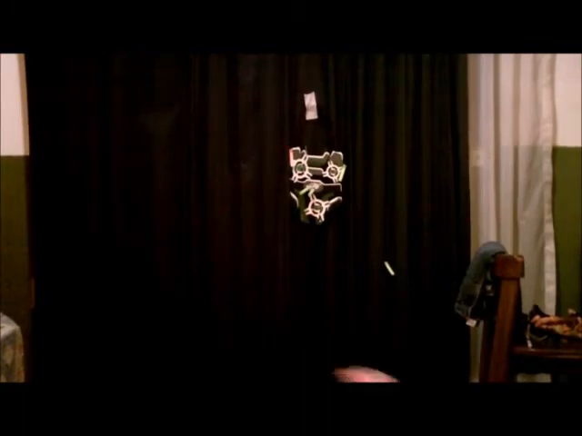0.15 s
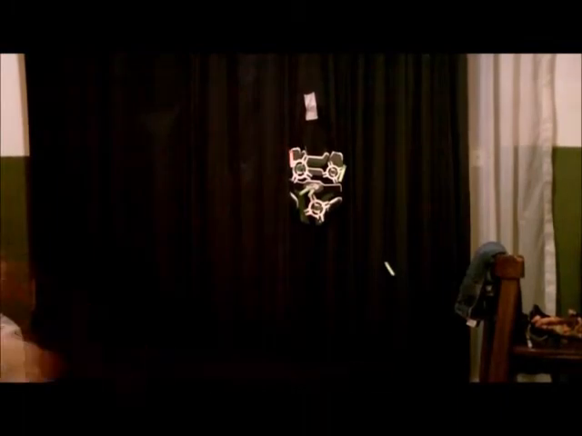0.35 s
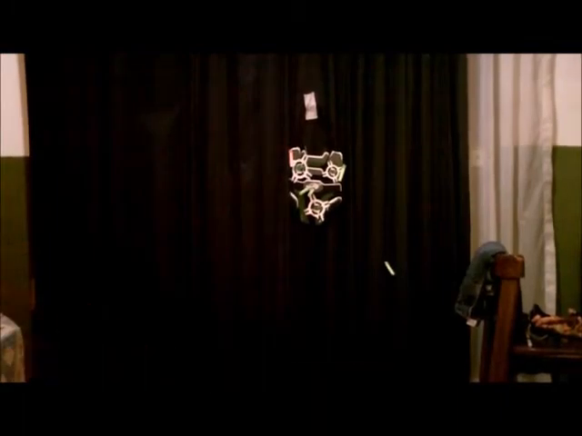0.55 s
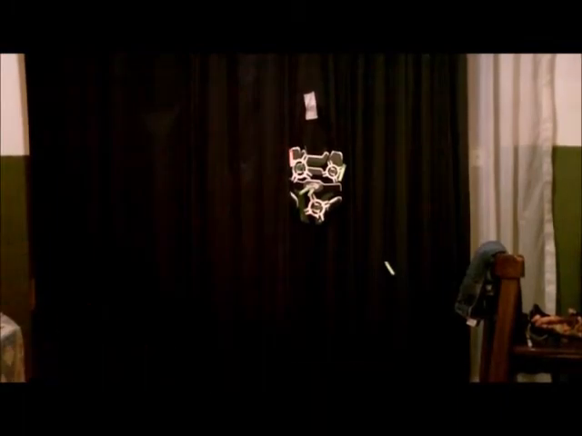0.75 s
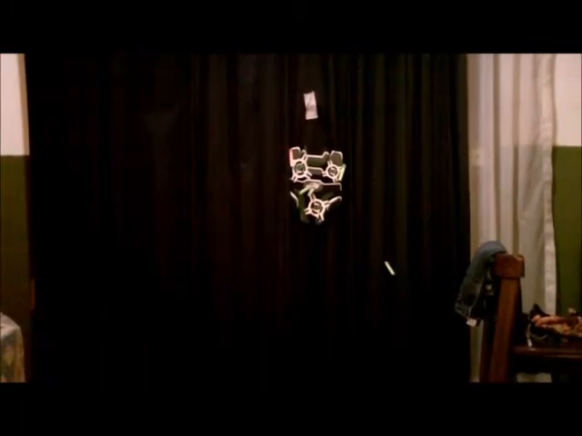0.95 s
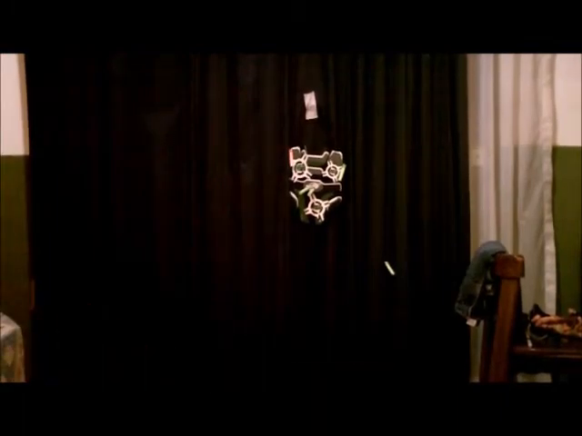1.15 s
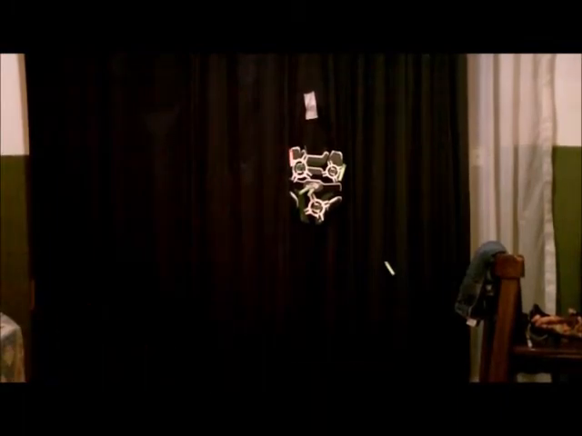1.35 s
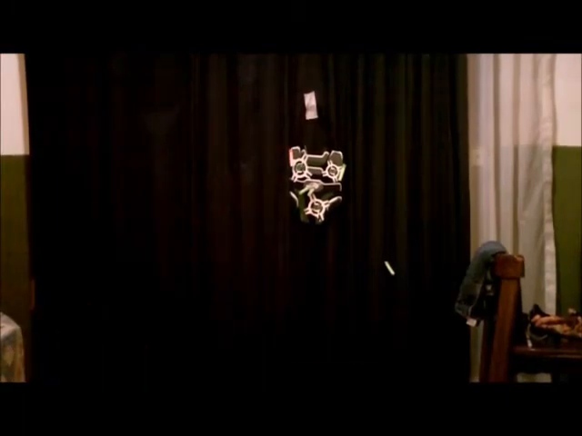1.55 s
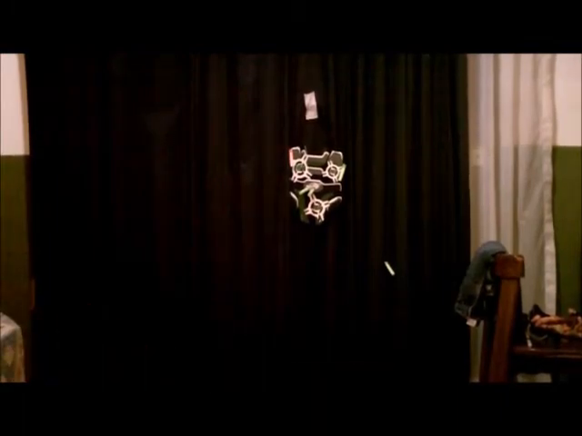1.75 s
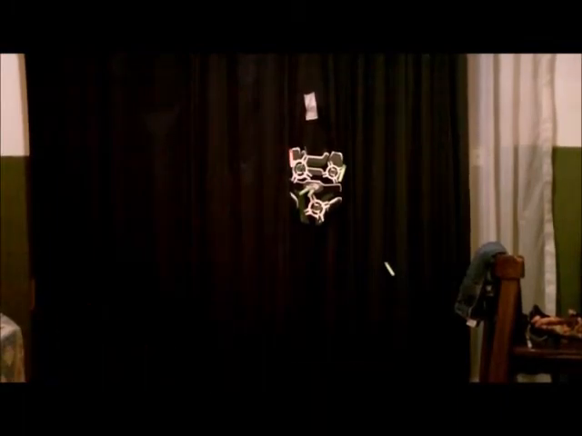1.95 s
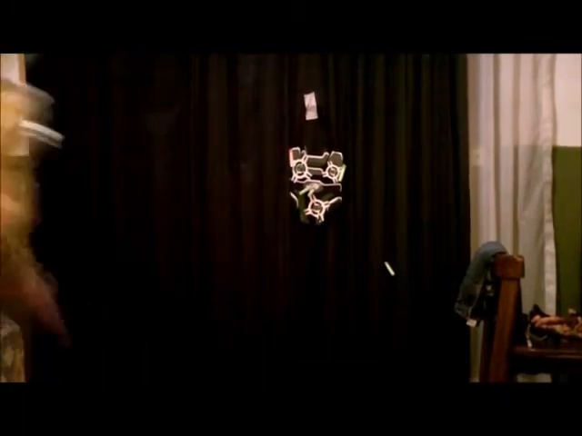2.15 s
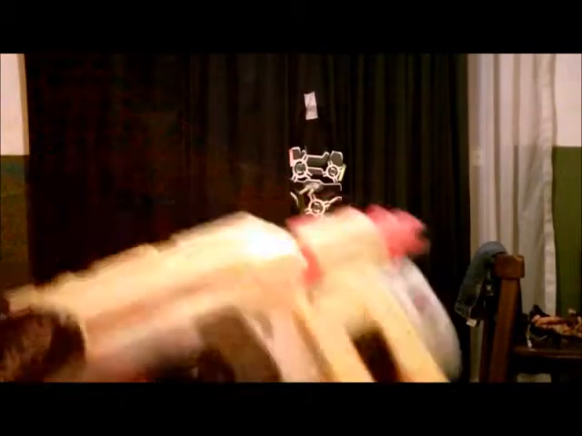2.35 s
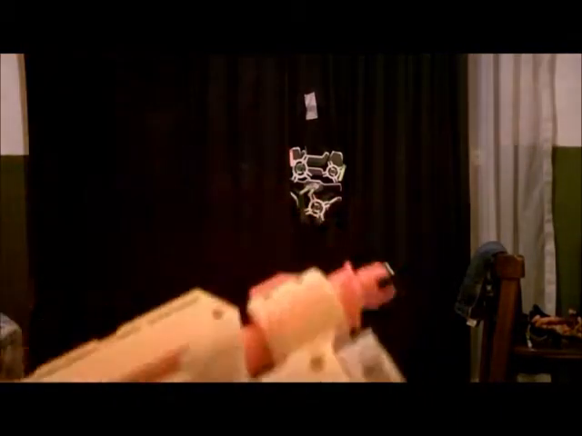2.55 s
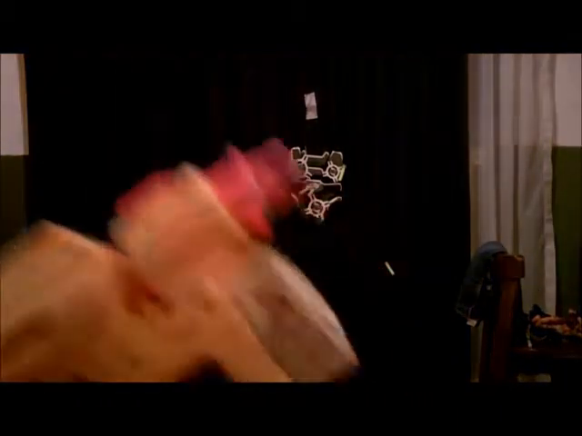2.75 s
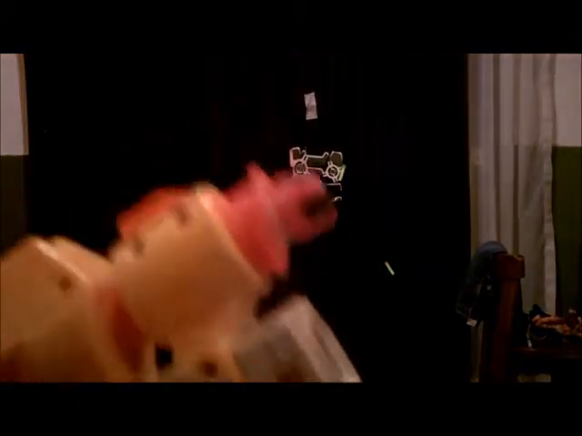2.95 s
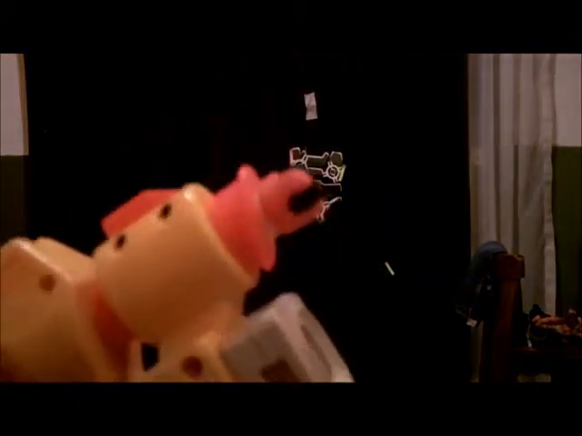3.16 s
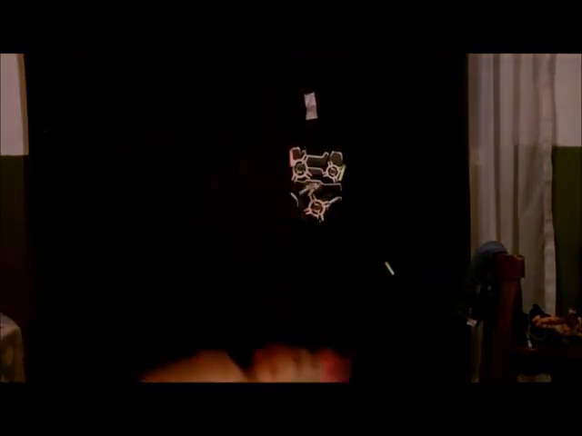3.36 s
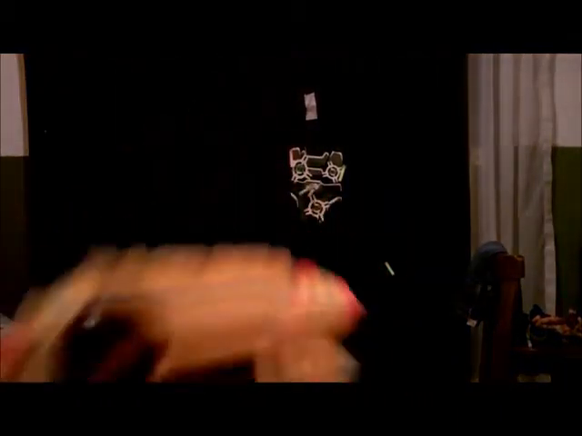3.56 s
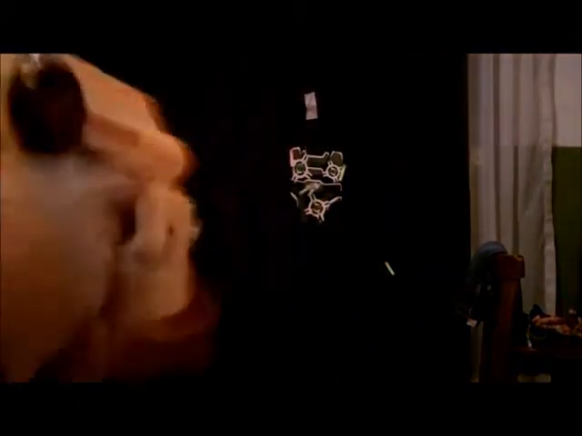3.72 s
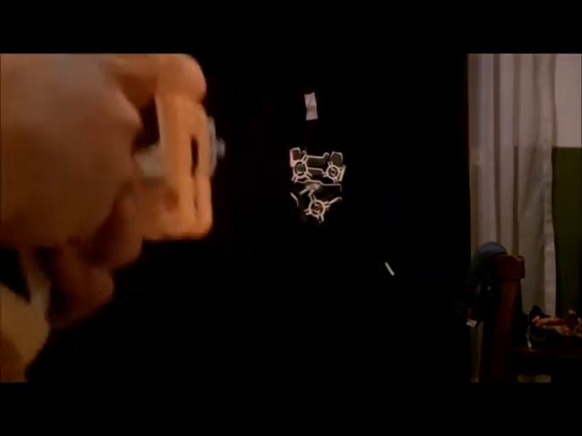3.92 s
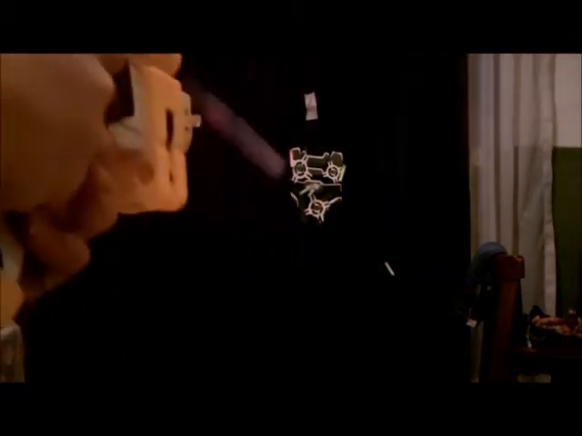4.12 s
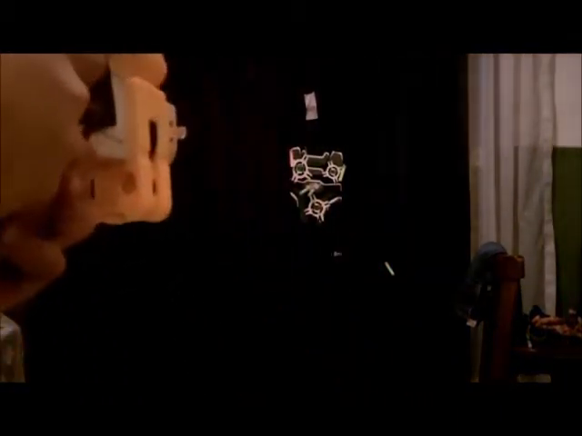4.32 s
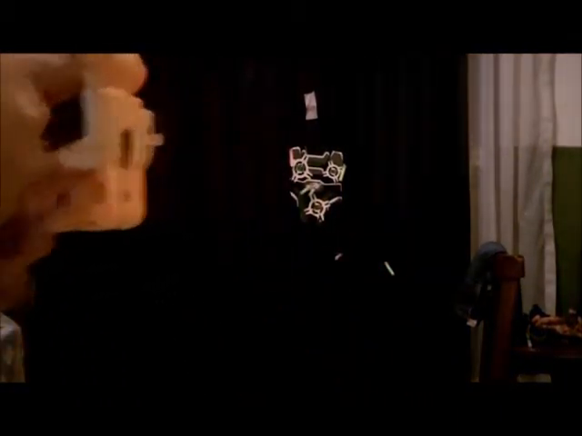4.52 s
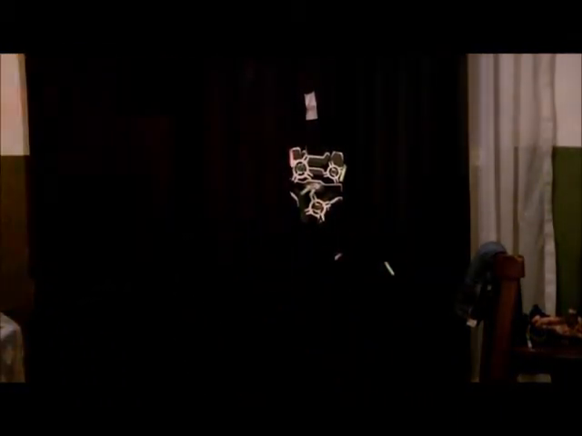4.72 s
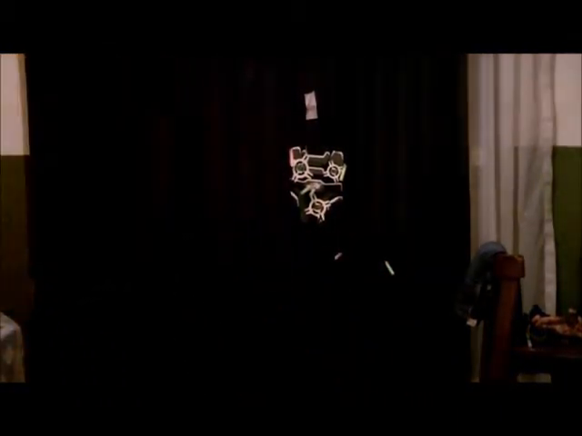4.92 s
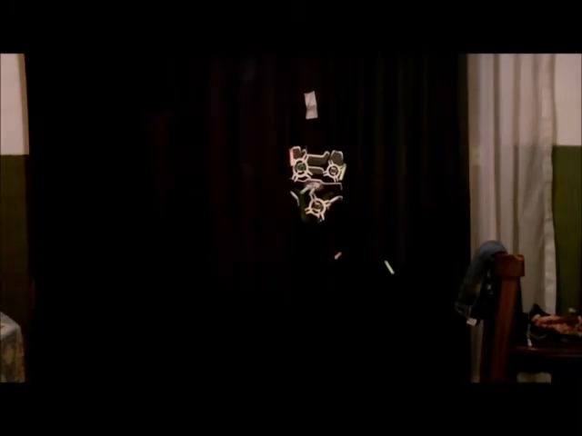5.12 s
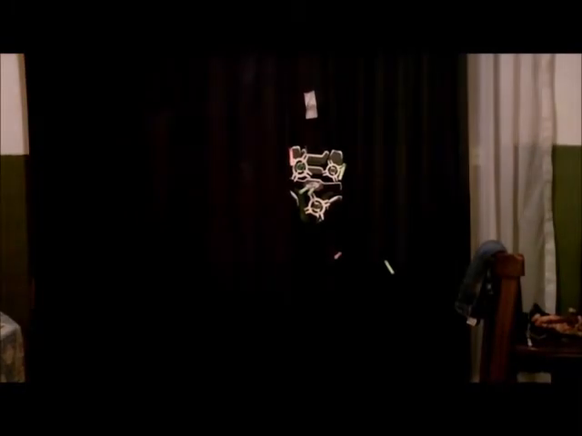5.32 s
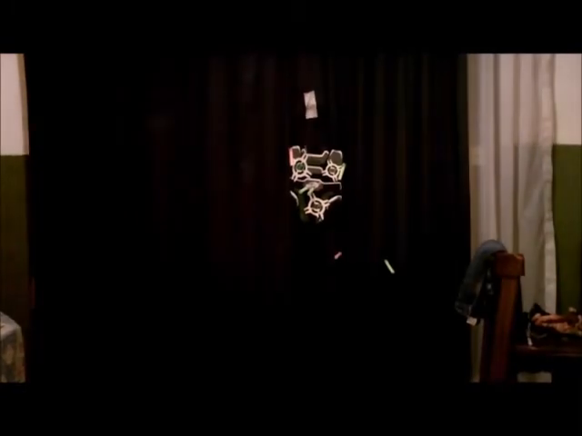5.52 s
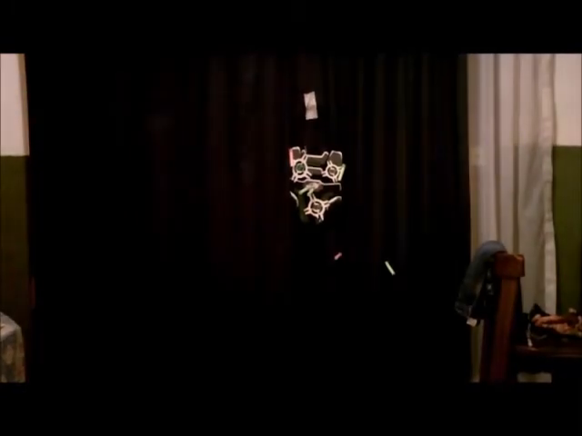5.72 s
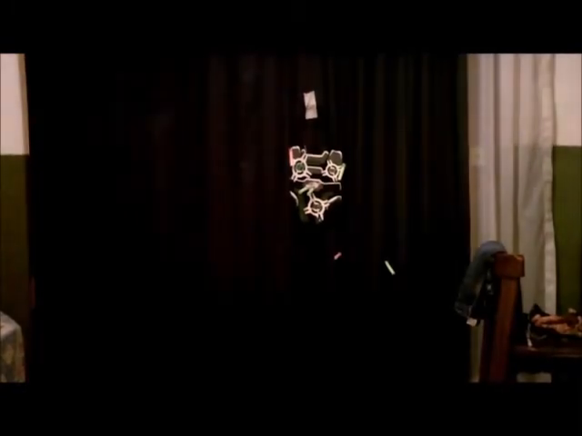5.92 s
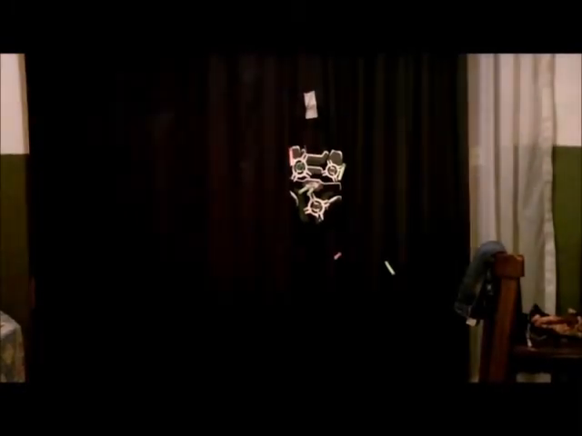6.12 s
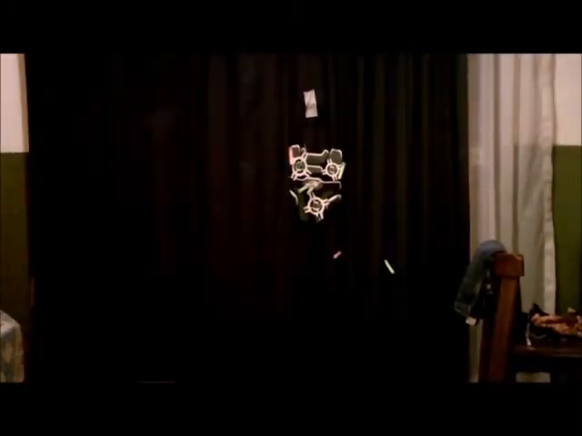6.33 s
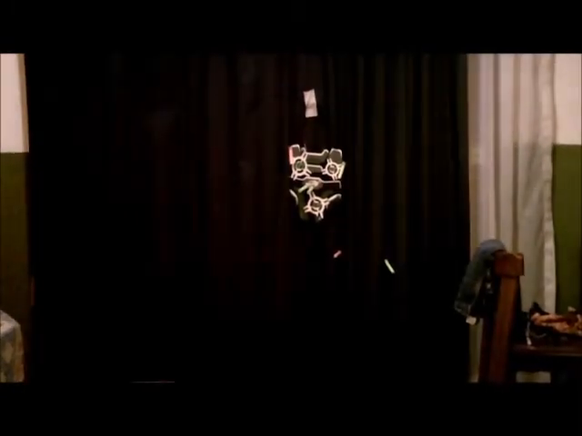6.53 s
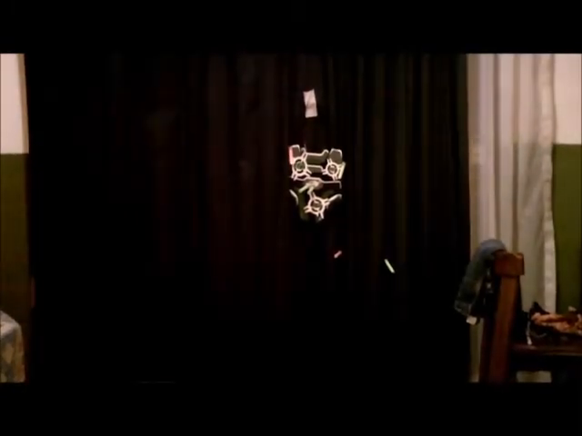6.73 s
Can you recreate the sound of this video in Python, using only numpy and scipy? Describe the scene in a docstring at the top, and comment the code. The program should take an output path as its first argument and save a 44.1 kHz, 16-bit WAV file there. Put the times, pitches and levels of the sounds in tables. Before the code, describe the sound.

A spring-powered toy dart blaster is handled near the microphone, with light rubbing and scattered plastic clicks. It is cocked with a sharp clack and fired once, a hard crack with a short metallic ring that is the loudest sound. Creaks and knocks follow as it is set down, then a few soft bumps and rubs. The small room adds a short echo over a faint rumble and hiss.

```python
"""Soft rubs and small clicks on hollow plastic, close by in a small room: a toy dart blaster is handled.
Catches snap and tight panels creak, then the slide ticks over its ratchet and slams into its stop.
On the shot, the loudest moment, the plunger hits home and bounces while the freed spring rings on.
The blaster is put down with a clatter. A limiter ducks the hardest blows and lets the room swell
up behind them."""
import sys
import numpy as np
from scipy import signal
from scipy.fft import rfft, irfft
from scipy.io import wavfile
from scipy.ndimage import uniform_filter1d

SR = 44100
rng = np.random.default_rng(int(sys.argv[2]) if len(sys.argv) > 2 else 0)


def unload_wav(signal):
    """Save mono or channel-first audio to the path in sys.argv[1] as 16-bit WAV at rate SR, clipped to [-1, 1]."""
    wavfile.write(
        sys.argv[1],
        SR,
        np.round(np.clip(np.atleast_2d(signal).T, -1, 1) * 32767).astype(np.int16),
    )


N = 298998
SHOT_S = 4.2  # the trigger releases the plunger

# the shell's registers (thump, hollow, knock, crack, sizzle): low_hz, high_hz
SHELL_REGISTERS = [(70, 290), (600, 860), (1050, 3030), (3300, 5320), (8800, 14100)]


def from_db(db):
    """Decibels to gain."""
    return 10 ** (np.asarray(db) / 20)


def unit_rms(x):
    """Scale to unit power."""
    return x / np.sqrt(np.mean(x ** 2) + 1e-20)


def at_hz(points, hz):
    """Read a curve on a log-frequency axis."""
    known_hz, values = np.transpose(points)
    return np.interp(np.log(hz + 1e-9), np.log(known_hz), values)


def tilted(db_per_octave, registers, pivot_hz=3000):
    """The dB that a spectral tilt adds to each register."""
    centre_hz = np.sqrt(np.prod(registers, axis=1))
    return db_per_octave * np.log2(centre_hz / pivot_hz)


def band(x, low_hz, high_hz, order=2):
    """Causal band-pass."""
    return signal.sosfilt(signal.butter(order, [low_hz, high_hz], "band", fs=SR, output="sos"), x)


def resonance(x, hz, width_hz):
    """Two-pole resonance with unity gain at its peak."""
    return signal.lfilter(*signal.iirpeak(hz, hz / width_hz, fs=SR), x + 1e-18)


def lag(x, time_s):
    """One-pole smoothing."""
    keep = np.exp(-1 / (time_s * SR))
    return signal.lfilter([1 - keep], [1, -keep], x)


def seconds(length_s):
    """Time axis of a short sound."""
    return np.arange(int(length_s * SR)) / SR


def add(track, start_s, sound):
    """Lay a sound into a track."""
    start = round(start_s * SR)
    track[start:start + len(sound)] += sound[:N - start]


def room_tone(air_db=-58.5, whine_hz=1010, whine_width_hz=25, whine_db=-80.5):
    """Low room rumble under a faint hiss and a thin, wavering whine."""
    # spectrum of still air and microphone hiss: frequency_hz, relative_db
    air_curve = [(20, 1.5), (60, 5), (140, -0.5), (300, -6.5), (600, -12.5), (1100, -15.5), (2000, -21),
                 (4200, -20), (7000, -32), (9600, -26.5), (12000, -28.5), (15000, -25.5)]
    colour = from_db(at_hz(air_curve, np.fft.rfftfreq(N, 1 / SR)))
    air = irfft(rfft(rng.standard_normal(N)) * colour, N)
    whine = resonance(rng.standard_normal(N), whine_hz, whine_width_hz)
    return from_db(air_db) * unit_rms(air) + from_db(whine_db) * unit_rms(whine)


def room_wash(x, build_s=0.0097):
    """Energy fills the room in milliseconds and drains as a diffuse wash, the mids lasting longest."""
    # the room's decay: frequency_hz, t60_s
    decay_curve = [(100, 0.21), (500, 0.36), (1500, 0.4), (4000, 0.34), (7000, 0.23), (14000, 0.25)]
    edges_hz = np.geomspace(70, 17000, 15)
    out, white = 0, rng.standard_normal((2, N))
    for k, (low_hz, high_hz) in enumerate(zip(edges_hz, edges_hz[1:])):
        drain_s = at_hz(decay_curve, np.sqrt(low_hz * high_hz)) / np.log(1e6)
        energy = band(x + 1e-9 * white[0], low_hz, high_hz, order=3) ** 2
        envelope = np.sqrt(lag(lag(energy, build_s), drain_s))
        out += envelope * unit_rms(band(white[k % 2], low_hz, high_hz, order=3))
    return out


def hollow_shell(x):
    """The hollow body lends its resonances to the sound."""
    # shell resonances: centre_hz, width_hz, gain_db
    modes = [(686, 38, -19), (745, 7.2, -13.5), (1493, 90, -5), (2058, 150, -16), (3430, 1100, -7),
             (4020, 100, -6), (4740, 150, -9.5)]
    return x + sum(from_db(gain_db) * resonance(x, hz, width_hz) for hz, width_hz, gain_db in modes)


def rubbing(trim_db=-2.0, grain_db=3.5, grains_per_s=400, rumble_db=-19.0, rumble_db_per_s=154.5):
    """Friction swells with each stroke, grainy from countless tiny slips; long strokes also rumble."""
    # hands, sleeve and slide on the shell: middle_s, half_length_s, level_db, tilt_db_per_octave
    strokes = [(0.193, .014, -55, 5), (0.263, 0.011, -64, 0), (0.388, 0.023, -54, 6.5),
               (0.51, 0.022, -60.5, 8.5), (0.665, 0.026, -55, 0.5), (0.845, 0.074, -63, -.5),
               (1.174, 0.013, -58, 3.5), (1.289, 0.019, -61, -0.5), (1.349, 0.018, -49.5, -1),
               (1.383, 0.0073, -50.5, -2.5), (1.482, 0.12, -67, -4), (1.754, 0.016, -57.5, -0.5),
               (2.115, 0.018, -48, 2.5), (2.16, 0.0057, -52, -2), (2.293, 0.034, -55, 0),
               (2.636, 0.027, -62, -7.5), (3.389, 0.011, -43, -4), (3.459, 0.045, -44, -1.5),
               (3.757, 0.0072, -55.5, -8.5), (3.825, 0.01, -45, -0.5), (4.181, 0.017, -43, -2),
               (4.918, 0.033, -54.5, -0.5), (6.39, 0.095, -61, 0.5), (6.576, .094, -57, -1),
               (6.726, 0.087, -53, 1)]
    # friction registers, rumble to sizzle: low_hz, high_hz
    registers = [(110, 420), (620, 1190), (1100, 3770), (3300, 5200), (5600, 7000), (8000, 11000)]
    # tone of every stroke, one value per register above the rumble: gain_db
    colour_db = [-10, -2.5, -1.5, -6.5, -10.5]
    t = np.arange(N) / SR
    grain_s = np.cumsum(rng.exponential(1, 20000)) / grains_per_s
    slips = rng.standard_normal(len(grain_s)).clip(-2, 2)
    grain = unit_rms(from_db(grain_db * np.interp(t, grain_s, slips)))
    swells = np.zeros((len(registers), N))
    for middle_s, half_s, level_db, tilt in strokes:
        near = np.abs(t - middle_s) < np.pi * half_s
        swell = np.exp(-((t[near] - middle_s) / half_s) ** 2)
        low_db = rumble_db + rumble_db_per_s * half_s
        upper_db = tilted(tilt, registers[1:]) + colour_db
        swells[:, near] += np.outer(from_db(level_db + np.append(low_db, upper_db)), swell)
    noises = [unit_rms(band(rng.standard_normal(N), *edges)) for edges in registers]
    return from_db(trim_db) * grain * np.sum(swells * noises, axis=0)


def snags(per_s=45, depth=1.4, decay_s=0.00054):
    """The rubbing surface catches on ridges: a gain curve of brief jumps in friction."""
    jumps = (rng.random(N) < per_s / SR) * rng.uniform(.5, 1.5, N)
    return 1 + depth * signal.lfilter([1], [1, -np.exp(-1 / (decay_s * SR))], jumps + 1e-18)


def creaks(overtone_ratio=2.4, rise_s=0.0012, t60_s=0.014, loss_db=0.1,
           pitch_scatter=0.037, scatter_db=1.54, max_slips=8):
    """Tight plastic gives way in jerks, each plucking a cluster of panel modes and an overtone."""
    # runs of slips: start_s, length_s, gap_s, level_db, pitch_hz, overtone_db
    runs = [(2.084, .02, .008, -50, 1650, 4), (2.111, .024, 0.0058, -45, 1970, 3),
            (4.6095, .03, .02, -42, 1590, -25), (4.646, .03, 0.02, -26.5, 1605, -9),
            (4.698, .005, .01, -33, 1760, -12), (4.835, .007, 0.0041, -38.5, 1200, -5.5),
            (5.177, .04, .0105, -41, 1584, 3.5), (5.241, .03, 0.021, -46.5, 1600, 5.5)]
    # modes of the creaking panel: pitch_ratio, gain_db
    panel_modes = [(.87, -13), (1, 8.5), (1.13, 1.5), (1.26, -17)]
    out, t = np.zeros(N), seconds(.06)
    envelope = from_db(-60 * t / t60_s) * (1 - np.exp(-t / rise_s))
    for start_s, length_s, gap_s, level_db, pitch_hz, overtone_db in runs:
        modes = panel_modes + [(overtone_ratio, overtone_db)]
        delays_s = gap_s * np.arange(max_slips)
        chance = rng.standard_normal((max_slips, 2))
        for k, delay_s in enumerate(delays_s[delays_s < length_s]):
            slip_hz = pitch_hz * (1 + pitch_scatter * chance[k, 0])
            slip_db = level_db - k * loss_db + scatter_db * chance[k, 1]
            ring = sum(from_db(db) * np.sin(2 * np.pi * ratio * slip_hz * t) for ratio, db in modes)
            add(out, start_s + delay_s, from_db(slip_db) * envelope * ring)
    return out


def struck_modes(strikes, t60_cycles):
    """Each strike sets one damped mode swinging, eased in over its first cycle."""
    out, t = np.zeros(N), seconds(.4)
    for start_s, level_db, hz in strikes:
        envelope = from_db(level_db - 60 * hz * t / t60_cycles) * (1 - np.exp(-2 * hz * t))
        add(out, start_s, envelope * np.sin(2 * np.pi * hz * t))
    return out


def thuds():
    """Jolts of the blaster and bumps of the hands land as low thuds."""
    # jolts and bumps: start_s, level_db, pitch_hz
    bumps = [(1.828, -41.5, 40), (3.821, -45, 45.6), (4.1966, -10.5, 135), (4.2, -26, 49.4),
             (4.415, -29.5, 127), (5.384, -39.5, 46), (6.17, -37.5, 114.6), (6.56, -44, 67.6),
             (6.722, -44, 49)]
    return struck_modes(bumps, t60_cycles=10)


def panel_knocks():
    """A knock sets one panel of the shell ringing."""
    # knocked panels: start_s, level_db, pitch_hz
    knocks = [(1.778, -26.5, 1955), (2.165, -40, 723), (2.678, -59, 675), (2.79, -42.5, 665),
              (2.791, -38, 1090), (3.367, -40, 785), (3.387, -32, 701), (3.469, -7, 3350),
              (3.478, -32, 786), (3.552, -30, 803), (3.552, -19, 2410), (3.767, -40, 916),
              (4.424, -24.5, 457), (4.426, -31, 610), (5.291, -37, 4340), (5.388, -20, 1745),
              (5.45, -33, 452.5), (5.558, -30, 301.4), (5.56, -35.5, 600), (5.577, -29.5, 492),
              (6.43, -46.5, 1030), (6.692, -28, 3630)]
    return struck_modes(knocks, t60_cycles=49)


def spring_ring(trim_db=-3.0, shiver_db=3):
    """The released spring and its tube ring on, shivering as the coils brush the wall."""
    # modes of the spring and plunger tube: pitch_hz, level_db, t60_s
    modes = [(759, -16, .32), (795, -13, .3), (958, -22, .2), (1461, -14, .25), (1526, -26, .36),
             (126, -31, .35), (305, -24, .25), (870, -25, .25), (828, -21, .2), (915, -22, .2),
             (1008, -48, 2.4), (1169, -31, .4), (3748, -28, .42), (3944, -26, .42), (4018, -22, .28),
             (4044, -26, .45), (4141, -28, .4), (4734, -23, .28), (4796, -27, .4), (4855, -21, .22),
             (5024, -24, .25)]
    out, t = np.zeros(N), seconds(1.5)
    for hz, level_db, t60_s in modes:
        shiver = np.interp(t, np.linspace(0, t[-1], 200), rng.standard_normal(200))
        envelope = from_db(trim_db + level_db + shiver_db * shiver - 60 * t / t60_s)
        add(out, SHOT_S, envelope * np.sin(2 * np.pi * (hz * t + rng.random())))
    return out


def plastic_hit(levels_db, crack_t60_s, registers, bass_hold=0.27, rise_s=0.00025):
    """Plastic on plastic: a short burst of dense chatter, the low registers dying last."""
    out, t = 0, seconds(.15)
    crack_low_hz, crack_high_hz = SHELL_REGISTERS[3]
    for (low_hz, high_hz), level_db in zip(registers, levels_db):
        t60_s = crack_t60_s * (crack_low_hz / low_hz) ** bass_hold
        chatter = rng.standard_normal(len(t)) * from_db(-60 * t / t60_s) * (1 - np.exp(-t / rise_s))
        ring = band(chatter, low_hz, high_hz, order=3 if low_hz > crack_high_hz else 2)
        peak_rms = np.sqrt(uniform_filter1d(ring ** 2, size=130).max())
        out += from_db(level_db) * ring / peak_rms
    return out


def ratchet(start_s=3.338, gap_s=.0095, level_db=-52.5, step_db=0.2, db_per_octave=-2.8, t60_s=.017):
    """The slide ticks over three teeth, each a little louder: rows for clicks()."""
    return [(start_s + k * gap_s, level_db + k * step_db, db_per_octave, t60_s) for k in range(3)]


def clicks(send_db=-11.5):
    """Small parts snap against the shell; a harder contact tilts the click brighter."""
    # catches, trigger and loose parts: start_s, level_db, tilt_db_per_octave, t60_s
    contacts = [(.5819, -53, 5, 0.024), (0.642, -40, 4.5, 0.033), (1.1, -64, -3, .015),
                (1.1706, -49, -2.5, 0.015), (1.3788, -50, 2, 0.016), (1.445, -53, 2, 0.019),
                (1.4925, -51, -2.5, 0.01), (1.5204, -44.5, 2.5, 0.046), (1.714, -39.5, -2, 0.016),
                (1.7776, -29, -2, 0.028), (1.9902, -57, -6, 0.011), (2.162, -37.5, 3, 0.045),
                (2.2887, -47.5, 6, .02), (2.319, -50, 2.5, .022), (2.3378, -53, -4.5, 0.016),
                (2.4649, -37, 5, 0.022), (2.6773, -47.5, -5, 0.035), (2.789, -46, -2.5, 0.029),
                (3.368, -45, -3, .008), (3.3823, -45, 12, 0.02), (3.387, -44.5, -5.5, 0.011),
                (3.459, -32.5, 1, .015), (3.478, -31, -1.5, 0.012), (3.6426, -38.5, 1.5, 0.032),
                (3.7658, -41.5, -2, 0.029), (3.8079, -33.5, 5, 0.03), (3.8212, -38.5, -2.5, 0.02),
                (3.901, -57, 15.5, 0.015), (3.9123, -49.5, -5, 0.017), (3.9974, -40.5, 6.5, .01),
                (4.1528, -37, -2.5, 0.014), (4.1596, -29.5, 4, 0.023), (4.415, -38, 5, 0.018),
                (4.4472, -30, 4.5, 0.0084), (4.575, -50.5, 11, 0.0078), (4.7005, -37.5, 1, 0.01),
                (4.7635, -49, 5.5, 0.026), (4.9672, -46, -1.5, 0.046), (4.9881, -49.5, -0.5, 0.049),
                (5.1639, -55.5, -1.5, 0.021), (5.2912, -54.5, 4, 0.029), (5.3825, -38, 2, 0.035),
                (5.3892, -28.5, -3, 0.029), (5.408, -36, -5, 0.046), (5.49, -37, -3.5, 0.072),
                (5.576, -31.5, 0, 0.069), (5.8092, -50, -0.5, 0.058), (5.8278, -49.5, -3, 0.028),
                (6.0391, -59, -7, 0.014), (6.6924, -39, 1, 0.0066), (6.713, -47, -6, 0.015)]
    # tone of every click, one value per shell register: gain_db
    colour_db = [-25.5, -18, -2, -1.5, -19]
    for start_s, level_db, tilt, t60_s in contacts + ratchet():
        levels_db = level_db + tilted(tilt, SHELL_REGISTERS) + colour_db
        yield start_s, plastic_hit(levels_db, t60_s, SHELL_REGISTERS), send_db


def plunger_rebounds(after_s=.0215, gap_s=.0165, loss_db=2.5):
    """The plunger bounces three times on its stop, weaker each time: rows for slams()."""
    crack_db, crack_hz = -21.5, 4762.5
    hollow_db, cavity_hz = -14.5, 780.5
    t60_s, send_db = 0.001, -25.5
    return [(SHOT_S + after_s + k * gap_s, crack_db - k * loss_db, hollow_db - k * loss_db,
             cavity_hz, crack_hz, t60_s, send_db) for k in range(3)]


def slams(cavity_spread=1.48, crack_spread=1.235):
    """Parts hit their stops hard; each stop has its own hollow cavity and cracks at its own pitch."""
    # blows of slide, plunger, dart and shell:
    # start_s, crack_db, hollow_db, cavity_hz, crack_hz, t60_s, room_send_db
    blows = [(3.468, -5.5, -26, 722, 5200, 0.011, -14.5), (3.5512, -20, -37, 700, 4200, 0.017, -10),
             (4.198, -19.5, -14, 735, 4200, 0.0087, -4.5), (4.2, 0, -8, 780, 4900, .016, -13),
             (4.2052, -1, -11, 750, 4950, 0.027, -15.5), (4.4205, -28, -23.5, 524, 5000, 0.023, -3),
             (5.4484, -25, -22.5, 560, 4100, 0.067, -8.5), (5.505, -32.5, -30.5, 644, 4200, 0.042, -2),
             (5.557, -17.5, -22.5, 430, 4000, 0.046, -7)]
    thump, _, knock, _, sizzle = SHELL_REGISTERS
    for start_s, crack_db, hollow_db, cavity_hz, crack_hz, t60_s, send_db in blows + plunger_rebounds():
        hollow = cavity_hz / cavity_spread, cavity_hz * cavity_spread
        crack = crack_hz / crack_spread, crack_hz * crack_spread
        thump_db = hollow_db - 17.5
        knock_db = (hollow_db + crack_db) / 2 - 5.5
        sizzle_db = 1.22 * crack_db - 10  # harder slams are brighter
        levels_db = [thump_db, hollow_db, knock_db, crack_db, sizzle_db]
        yield start_s, plastic_hit(levels_db, t60_s, [thump, hollow, knock, crack, sizzle]), send_db


def scene(rub_send_db=-9.0, panel_send_db=-11.5):
    """The blaster close by and the room behind it, in mono."""
    hits, hit_send = np.zeros((2, N))
    for start_s, hit, send_db in [*slams(), *clicks()]:
        add(hits, start_s, hit)
        add(hit_send, start_s, hit * from_db(send_db))
    rub = rubbing() * snags()
    panels = creaks() + panel_knocks()
    wash = room_wash(hit_send + from_db(rub_send_db) * rub + from_db(panel_send_db) * panels)
    body = hollow_shell(hits + rub + wash)
    return (body + panels + spring_ring() + thuds() + room_tone())[None]


def limiter(x, threshold_db=-11.0, release_db_per_s=153.0, attack_s=0.0002):
    """The gain drops quickly on a loud blow, letting its first edge through, and climbs back steadily."""
    level_db = 10 * np.log10(np.abs(uniform_filter1d(x ** 2, size=66)) + 1e-12)
    over_db = np.maximum(level_db - threshold_db, 0)
    climb_db = release_db_per_s * np.arange(N) / SR
    cut_db = np.maximum.accumulate(over_db + climb_db, axis=-1) - climb_db
    return x * from_db(-lag(cut_db, attack_s))


def record(dry):
    """The microphone port carves its notches, peaks are limited and clipped, and the top is cut."""
    # cancellations in the microphone port: centre_hz, width_hz, share_removed
    notches = [(2720, 750, .96), (5490, 480, .95), (7900, 900, .84), (10950, 850, .92)]
    for hz, width_hz, share in notches:
        dry = dry - share * resonance(dry, hz, width_hz)
    top_cut = signal.ellip(10, .3, 80, 15500, fs=SR, output="sos")
    return signal.sosfilt(top_cut, np.clip(limiter(dry), -1, 1))


dry = scene()
out = record(dry)
unload_wav(out)
```